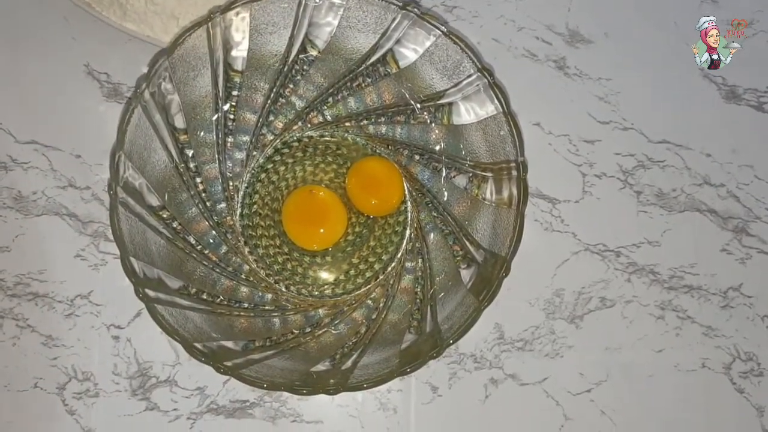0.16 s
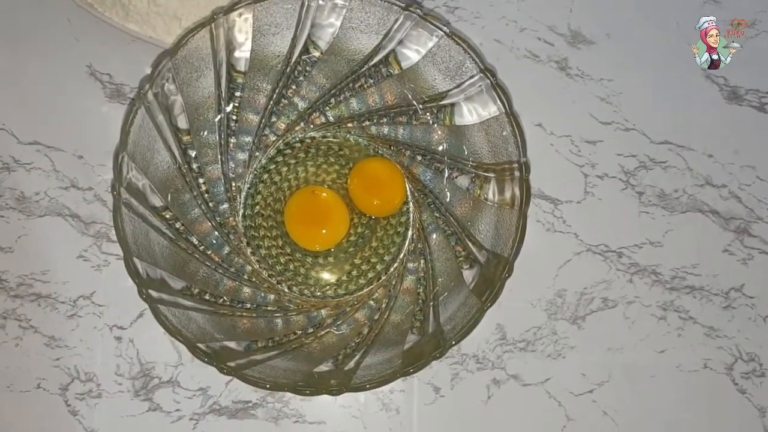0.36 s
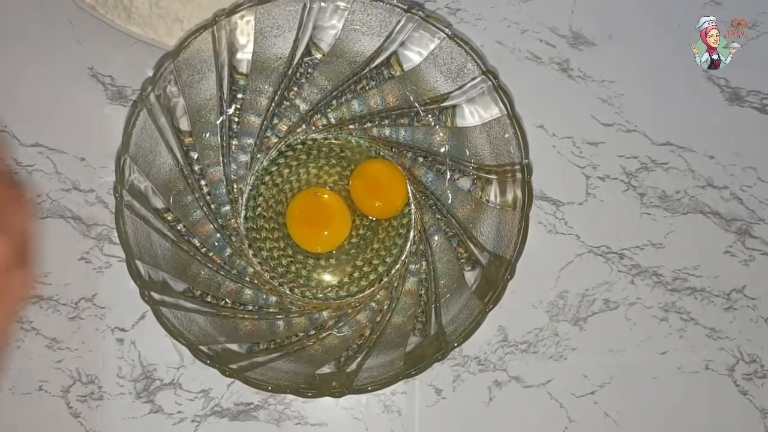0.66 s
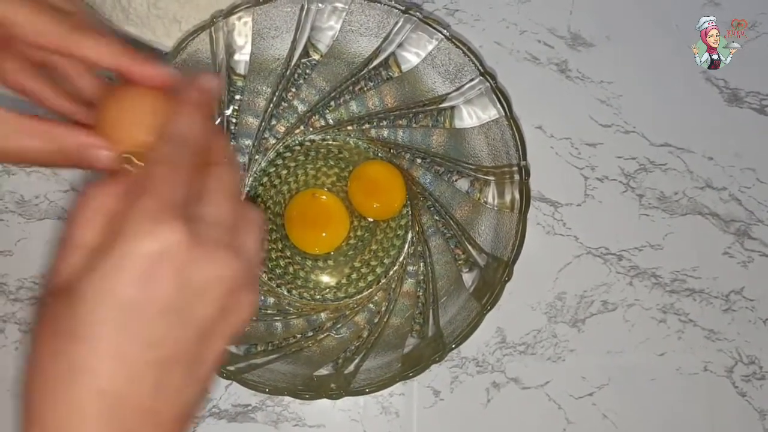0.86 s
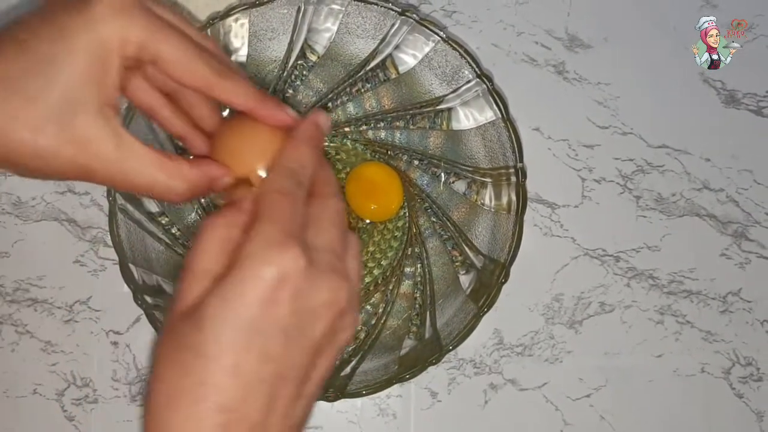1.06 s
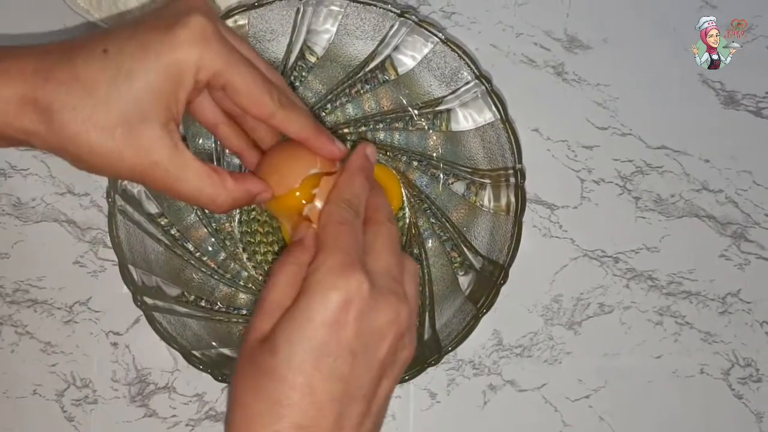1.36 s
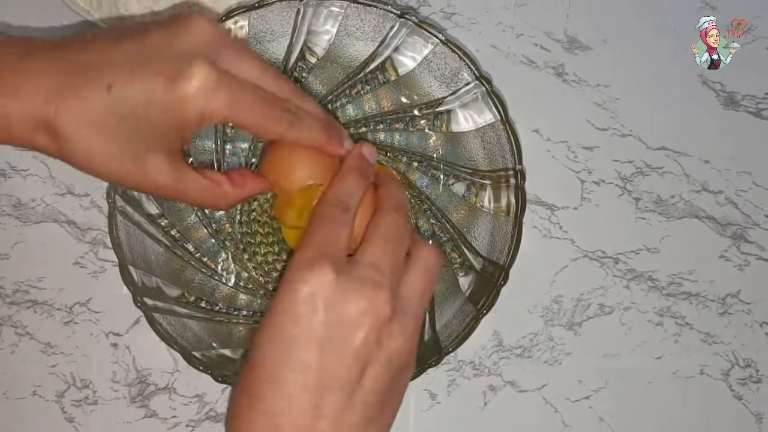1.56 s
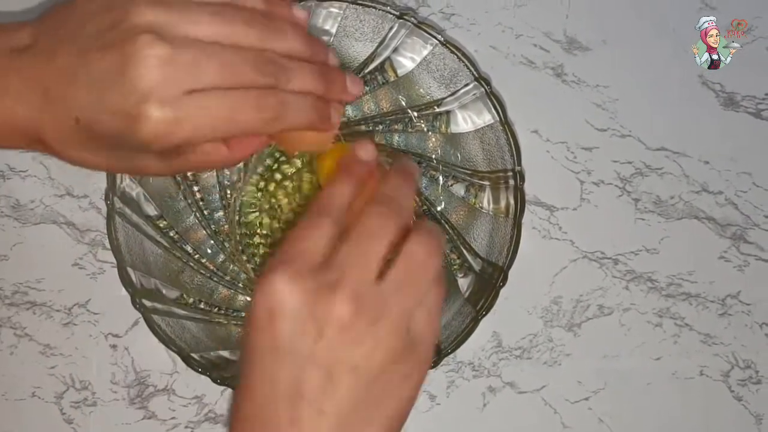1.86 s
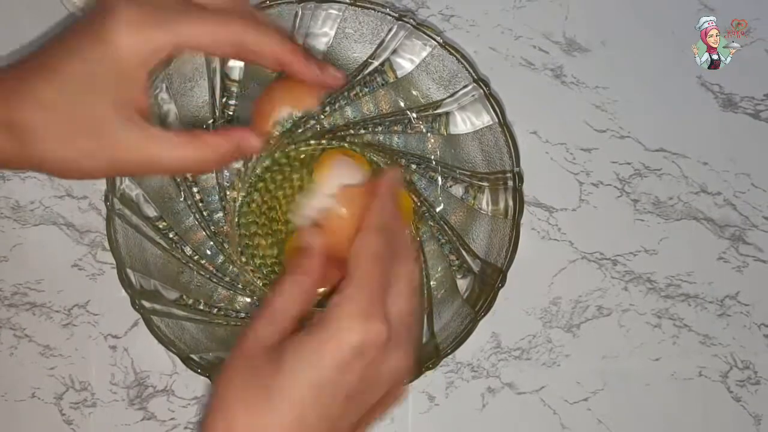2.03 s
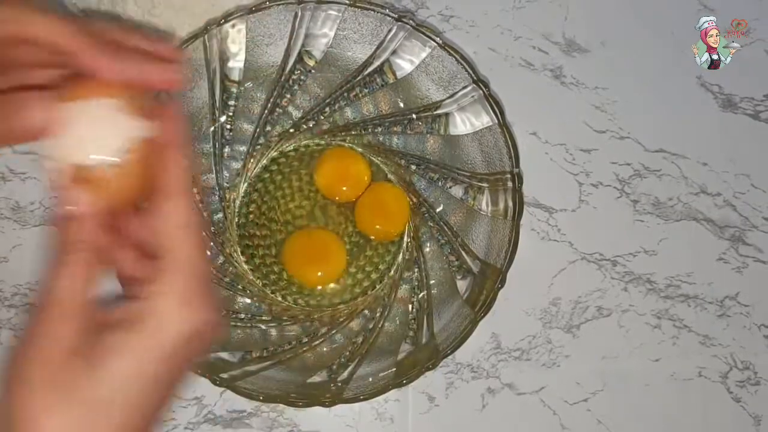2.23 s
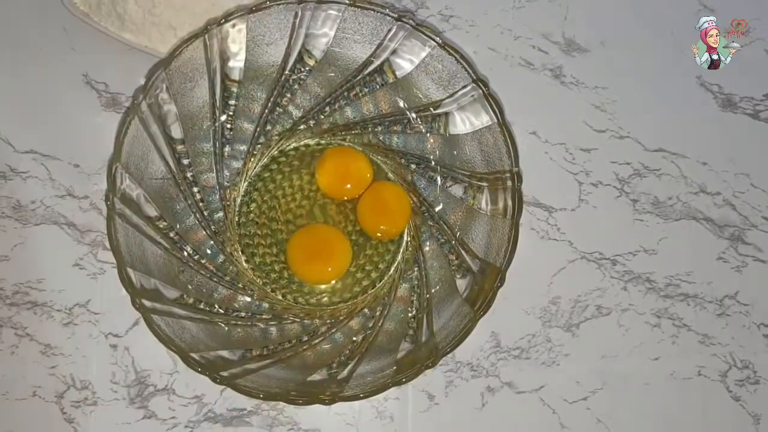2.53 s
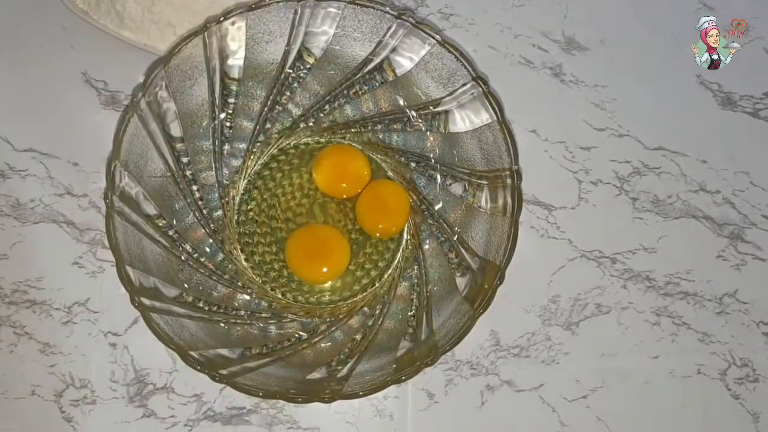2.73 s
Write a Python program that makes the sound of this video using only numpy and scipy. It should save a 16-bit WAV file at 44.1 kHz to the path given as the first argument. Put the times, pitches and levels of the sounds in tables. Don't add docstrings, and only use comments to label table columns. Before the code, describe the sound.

An egg is knocked, cracked and split by hand over a glass bowl, crisp and close

```python
import sys
import numpy as np
from scipy import signal
from scipy.fft import rfft, irfft
from scipy.io import wavfile

SR = 44100
rng = np.random.default_rng(int(sys.argv[2]) if len(sys.argv) > 2 else 0)


def gain_from_db(level_db):
    decades = np.asarray(level_db, float) / 20
    return 10 ** decades


def unload_wav(signal):
    wavfile.write(
        sys.argv[1],
        SR,
        np.round(np.clip(np.atleast_2d(signal).T, -1, 1) * 32767).astype(np.int16),
    )


N = 125685


def unit(x):
    return x / np.sqrt(np.mean(x ** 2))


def colour(x, points):
    hz, db = np.array(points, float).T
    size = x.shape[-1]
    f = np.maximum(np.fft.rfftfreq(size, 1 / SR), 1)
    return irfft(rfft(x) * gain_from_db(np.interp(np.log(f), np.log(hz), db)), size)


def band(x, hz, width):
    return signal.lfilter(*signal.iirpeak(hz, 1 / width, fs=SR), x)


def highpass(x, order, hz):
    return signal.sosfilt(signal.butter(order, hz, "high", fs=SR, output="sos"), x)


def curve(table):
    s, db = np.array(table).T
    return gain_from_db(np.interp(np.arange(N) / SR, s, db))


def add(out, s, x):
    i = int(s * SR)
    out[i:i + len(x)] += x[:len(out) - i]


def peak(x, db):
    return x * gain_from_db(db) / np.abs(x).max()


def port_noise():
    likeness = .78
    shared, *own = rng.standard_normal((3, N))
    return likeness * shared + np.sqrt(1 - likeness ** 2) * np.array(own)


# (frequency [Hz], level [dB per Hz])
AIR = [(25, -13.5), (60, -9.5), (150, -16), (400, -29.5), (1000, -33), (4000, -40), (10000, -42.5),
       (16000, -36.5)]


def hiss():
    return gain_from_db(-64.5) * unit(colour(port_noise(), AIR))


# (time [s], level [dB])
HUM = [
    (0.0, -44),
    (0.09, -75),
    (0.5, -71),
    (0.57, -94.5),
    (0.72, -81),
    (2.03, -74.5),
    (2.21, -51),
    (2.68, -82),
    (2.85, -61.5),
]


def hum():
    hz, width_hz = 62, 12
    return curve(HUM) * unit(band(band(port_noise(), hz, width_hz / hz), hz, .5))


# (time [s], level [dB])
SLEEVE = [
    (0.6, -77.5),
    (0.626, -79),
    (0.851, -67.5),
    (1.277, -65.5),
    (1.31, -72),
    (1.4, -95),
    (1.45, -94),
]


def sleeves():
    hz, width = 330, .8
    cloth = unit(band(band(port_noise(), hz, width), hz, width))
    return curve([(0.0011, -99), *SLEEVE, (1.6, -99)]) * cloth


# (frequency [Hz], T60 [s])
ROOM_T60 = [(200, 0.28), (1500, 0.29), (4000, 0.26), (9000, 0.15), (15000, 0.34)]


def kitchen(x):
    early_s, gap_s, bass_db = 0.0077, 0.00089, 1.5
    early_db, tail_db = -5, -5
    t = np.arange(SR // 2) / SR
    table_hz, table_t60 = np.array(ROOM_T60).T
    tail = 0
    for hz in 100 * 2 ** np.arange(0, 7.4, .5):
        t60 = np.interp(np.log(hz), np.log(table_hz), table_t60)
        noise = band(rng.standard_normal((2, len(t))), hz, 0.87)
        tail = tail + noise * gain_from_db(bass_db * (hz < 600)) * np.exp(-t * np.log(1000) / t60)
    sparse = rng.random((2, len(t))) < .05
    early = rng.standard_normal((2, len(t))) * sparse * np.exp(-t / early_s)
    reply = gain_from_db(tail_db) * unit(tail) + gain_from_db(early_db) * unit(early)
    reply = reply * np.clip(t / gap_s, 0, 1) ** 2 / np.sqrt(len(t))
    return signal.fftconvolve(x[None], reply, axes=1)[:, :N]


# (frequency [Hz], level [dB per Hz])
SHELL = [(1200, -22.5), (2200, -4), (3400, -9), (6000, -3.5), (10000, -0.5), (13000, -4), (16000, -7)]
# (time [s], level [dB])
RUSTLE = [
    (.45, -87.5),
    (.6, -68.5),
    (.8, -62),
    (1.1, -69.5),
    (1.25, -68),
    (2, -70.5),
    (2.3, -95),
    (2.85, -72),
]


def rustle():
    return curve(RUSTLE) * unit(colour(rng.standard_normal(N), SHELL))


def grains():
    per_s, spread_db = 2500, 2.5
    hits = (rng.random(N) < per_s / SR) * rng.standard_normal(N)
    return hits * gain_from_db(spread_db * np.minimum(rng.exponential(size=N), 3))


# (time [s], level [dB])
OOZE = [
    (1.9, -88),
    (1.94, -59),
    (1.98, -76),
    (2.01, -62),
    (2.07, -93),
]


def ooze():
    hz, width = 2150, .3
    return curve(OOZE) * unit(band(band(grains(), hz, width), hz, width))


# (share of the main frequency [ratio], level [dB])
KNOCK_MODES = [(.62, -18), (.86, -8), (1, 17.5), (1.24, 4.5), (1.55, -17.5)]


def rings(table, t60, side_db=0):
    push_s = 0.0001
    out, t = np.zeros(N), np.arange(4096) / SR
    for s, db, hz in table:
        push = (1 + rng.standard_normal(128)) * np.exp(-t[:128] / push_s)
        modes = 0
        for share, level in KNOCK_MODES:
            side = share != 1
            uneven_db, detune = 2 * rng.standard_normal(), 0.11 * rng.standard_normal() * side
            mode = np.sin(2 * np.pi * hz * share * (1 + detune) * t)
            modes = modes + gain_from_db(level + uneven_db + side_db * side) * mode
        ring = np.convolve(push, modes * np.exp(-t * np.log(1000) / t60))
        add(out, s, peak(highpass(ring, 4, hz / 2), db))
    return out


# (time [s], peak level [dB], frequency [Hz])
THUDS = [(.309, -30, 475), (.355, -21.5, 600), (.366, -28.5, 330), (.378, -33.5, 204), (1.3105, -52, 320),
         (1.311, -48.5, 583), (1.64, -58, 760), (1.717, -56, 690), (1.823, -56.5, 706), (2.225, -43, 650),
         (1.298, -53.5, 448), (.203, -42, 486.5), (2.54, -48, 127), (2.59, -52, 116)]


def thuds():
    return rings(THUDS, .035)


# (time [s], peak level [dB], cavity frequency [Hz])
CUPS = [(0.206, -23.5, 1790), (.211, -17, 1774), (.227, -29, 1750), (0.2436, -31.5, 2150),
        (0.2885, -21, 1797), (0.3092, -13, 1780), (0.3292, -10.5, 1730), (2.4339, -42, 1695),
        (2.5043, -16, 1636), (2.5133, -25.5, 1653), (2.521, -22, 1513), (2.5317, -21.5, 1727),
        (2.5399, -28.5, 1530), (2.5504, -33, 1600), (2.5606, -32.5, 1610), (2.5667, -30.5, 1490),
        (2.58, -50, 1584), (1.411, -37.5, 2326), (1.53, -35, 2334)]
# (time [s], peak level [dB], frequency [Hz])
WET = [
    (1.915, -42, 1996),
    (1.926, -51, 2240),
]


def cups():
    t60, side_db = .04, -8
    return rings(CUPS, t60, side_db) + rings(WET, t60, side_db)


# (time [s], peak level [dB], frequency [Hz])
KNOCKS = [(.3095, -7, 1276), (.317, -11, 1195), (1.4735, -36, 4160), (1.5235, -22, 3370),
          (1.5846, -33, 3170), (1.639, -37, 3270), (1.68, -51, 3500), (1.7163, -43, 4400),
          (1.715, -37.5, 3460), (1.89, -45, 3270), (.5535, -39.5, 2380), (.2028, -9.5, 1814),
          (.2885, -29.5, 2570), (.5555, -46.5, 1350), (1.398, -32.5, 3200), (1.918, -47.5, 2730),
          (2.17, -29.5, 2070), (0.309, -5.5, 1820), (0.365, -9, 1380), (0.37, -11, 1670),
          (0.377, -32, 1500), (0.553, -32, 1880), (0.554, -32, 2735), (0.819, -52, 946), (0.856, -42, 825),
          (1.31, -30.5, 2560), (1.397, -36, 2370), (1.525, -38.5, 2260), (2.161, -20, 2114),
          (2.202, -17.5, 1930), (2.216, -20, 1800), (2.226, -15, 1860)]


def knocks():
    return rings(KNOCKS, 0.015)


CRUNCH_STARTS_S = [.183, .203, .309, .34, .35, .82, 1.085, 1.285, 1.398, 1.474, 1.585, 1.823, 1.888, 2.163,
                   2.215, 2.42, 2.53, .235, 2.215, 1.41, 1.29]
# (length [s], bright level [dB], hollow level [dB], cavity frequency [Hz])
CRUNCHES = [(0.023, -41, -42, 1800), (0.023, -39, -33, 2400), (0.044, -41.5, -23.5, 1290),
            (0.042, -33, -31.5, 950), (0.037, -56, -27.5, 2780), (0.16, -52, -60, 1010),
            (0.09, -64, -67, 620), (0.041, -33.5, -55, 1500), (0.024, -47.5, -57, 2700),
            (0.12, -52.5, -53, 3200), (0.17, -63, -63.5, 2100), (0.028, -50.5, -79, 1300),
            (0.062, -51.5, -63, 2400), (0.087, -36, -42, 2800), (0.084, -33, -38, 1830),
            (0.13, -45.5, -56, 1700), (0.046, -37.5, -36, 1940), (0.19, -49.5, -44.5, 2500),
            (0.049, -41, -46.5, 960), (0.028, -61, -69, 3400), (0.025, -56, -55, 1900)]


def crunch():
    rise_s, cavity_width = .005, 0.57
    bright, dull = colour(grains(), SHELL), grains()
    out, t = np.zeros(N), np.arange(N) / SR
    for s, (length, bright_db, hollow_db, hz) in zip(CRUNCH_STARTS_S, CRUNCHES):
        rise, fall = (t - s) / rise_s, 2 * (s + length - t) / length
        shape = np.clip(np.minimum(rise, fall), 0, 1)
        hollow = unit(band(band(shape * dull, hz, cavity_width), hz, 2 * cavity_width))
        run = gain_from_db(bright_db) * unit(shape * bright) + gain_from_db(hollow_db) * hollow
        out += run * np.sqrt(length * SR / N)
    return out


def fractures(table):
    decay_s, width, peak_db, low_hz = .0007, .6, 2, 2600
    foot, top = .45, 1.4
    evenness = .2
    out, t = np.zeros(N), np.arange(512) / SR
    for s, db, hz in table:
        noise = rng.standard_normal(len(t))
        spectrum = rfft(noise * np.sqrt(t) * np.exp(-t / decay_s))
        size = np.abs(spectrum)
        burst = irfft(spectrum / (size + evenness * size.mean())) * np.exp(-t / (4 * decay_s))
        bright = highpass(burst, 4, max(low_hz, foot * hz))
        bright = signal.lfilter(*signal.butter(1, min(top * hz, .45 * SR), fs=SR), bright)
        add(out, s, peak(bright + gain_from_db(peak_db) * band(burst, hz, width), db))
    return out


# (time [s], peak level [dB], brightest frequency [Hz])
TICKS = [(0.5514, -32.5, 10200), (0.6907, -41, 9040), (0.822, -37, 8340), (0.857, -27, 7800),
         (0.8905, -26, 6320), (0.9275, -32.5, 5550), (0.9442, -25, 11600), (1.0851, -45, 6380),
         (1.102, -32, 9560), (1.1474, -46.5, 7620), (1.257, -22.5, 9000), (1.3843, -24, 10500),
         (1.4863, -21.5, 10300), (1.5024, -27, 8140), (1.5842, -38, 3460), (1.6126, -23, 10630),
         (1.631, -40, 9180), (1.6375, -30.5, 3530), (1.679, -32, 7300), (1.6864, -31.5, 3730),
         (1.6964, -34, 3420), (1.7163, -27.5, 8300), (1.782, -42, 7100), (1.823, -22.5, 6630),
         (1.8876, -36, 5980), (1.916, -22.5, 6970), (1.9358, -38, 5530), (2.8285, -41.5, 7440)]


def ticks():
    return fractures(TICKS)


# (time [s], peak level [dB], brightest frequency [Hz])
SNAPS = [(0.1935, -28.5, 8300), (0.2019, -14.5, 5300), (0.3077, -8, 5300), (0.3214, -18.5, 5910),
         (0.4833, -30.5, 11000), (1.2386, -28.5, 6750), (1.2882, -16.5, 9970), (1.2955, -8.5, 9090),
         (1.2975, -5.5, 8240), (1.308, -28, 7000), (1.3179, -34.5, 4740), (1.3972, -18, 10700),
         (1.3995, -24, 10000), (1.4735, -28, 10400), (1.5205, -19.5, 9660), (1.5234, -7.5, 7960),
         (1.5344, -41, 6220), (2.1026, -31.5, 10700), (2.1612, -8, 8860), (2.1625, -18, 6000),
         (2.1894, -30, 10100), (2.2004, -20.5, 5600), (2.2418, -16, 7640), (2.2614, -13, 5250),
         (2.4189, -18, 10900), (2.4324, -22.5, 11600), (2.5042, -12.5, 5950), (2.5298, -15, 5130),
         (2.5321, -17, 10500), (2.5506, -16, 10700), (2.5614, -14, 5560)]
# (time [s], peak level [dB], brightest frequency [Hz])
BREAK = [
    (.3531, -20, 6200),
    (1.2845, -3.5, 11000),
    (1.2858, -7, 9500),
    (1.3103, -8, 5500),
    (1.3106, -6, 10500),
]


def snaps():
    return fractures(SNAPS) + fractures(BREAK)


# (time [s], delay of the right port [ms])
PORT_LAG = [
    (.2, .48),
    (.4, .43),
    (1, .43),
    (1.28, .07),
    (1.32, .14),
    (1.52, .25),
    (1.9, .13),
    (2.15, .12),
    (2.3, .24),
    (2.42, .5),
]


def two_ports(egg):
    s, ms = np.array(PORT_LAG).T
    lag = np.interp(np.arange(N) / SR, s, ms) / 1000
    source = np.arange(N) - np.round(lag * SR).astype(int)
    return np.array([egg, egg[np.maximum(source, 0)]])


def scene():
    hand_shade_db, pan_db = -4, 3
    egg = thuds() + cups() + knocks() + crunch() + ooze() + rustle() + snaps()
    faint = ticks()
    echoes = kitchen(egg + faint)
    direct = two_ports(egg + gain_from_db(hand_shade_db) * faint)
    pan = gain_from_db(np.array([[pan_db], [-pan_db]]) / 2)
    return pan * (direct + echoes + hiss() + hum() + sleeves())


def band_limit(x):
    return signal.sosfilt(signal.butter(12, 16510, fs=SR, output="sos"), x)


def record(dry):
    top_hz, bass_cut_hz = 15600, 34
    top_cut = signal.ellip(8, .2, 50, top_hz, fs=SR, output="sos")
    mix = signal.sosfilt(top_cut, np.clip(dry, -1, 1))
    mix = highpass(mix, 2, bass_cut_hz)
    return band_limit(mix)


dry = scene()
out = record(dry)
unload_wav(out)
```